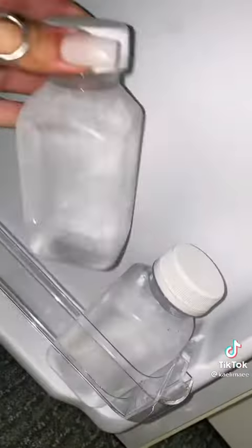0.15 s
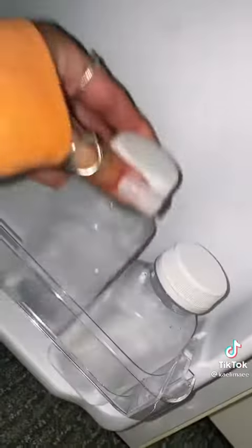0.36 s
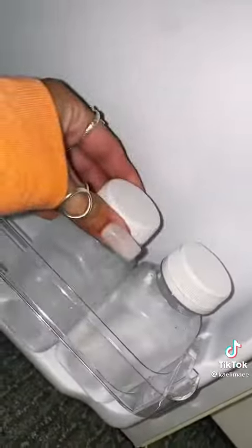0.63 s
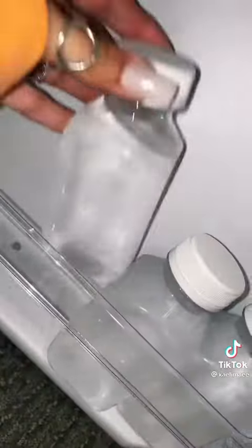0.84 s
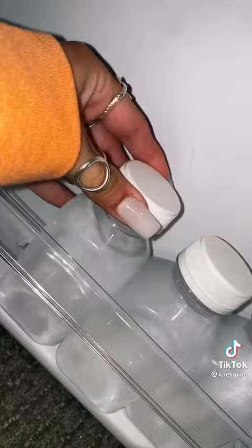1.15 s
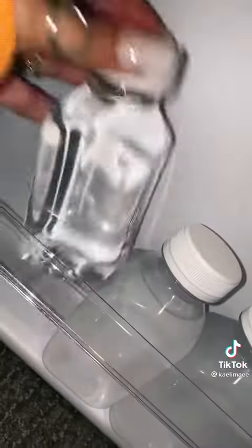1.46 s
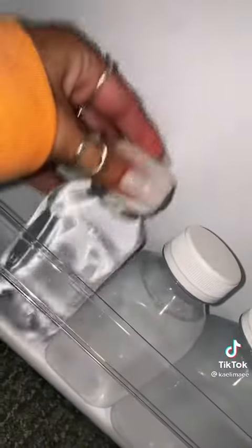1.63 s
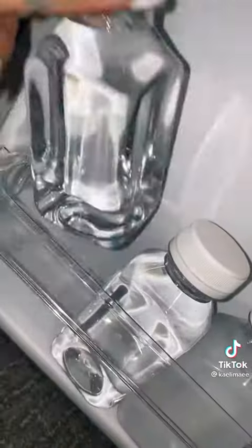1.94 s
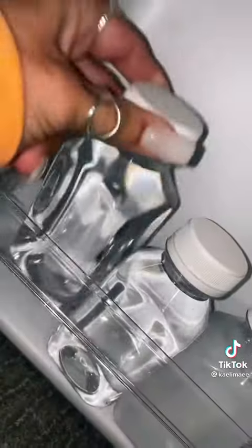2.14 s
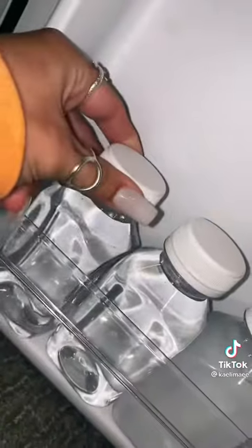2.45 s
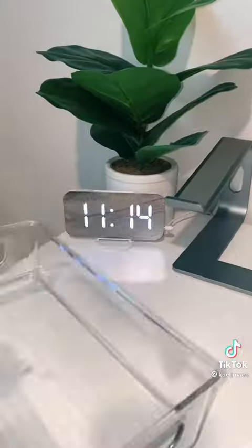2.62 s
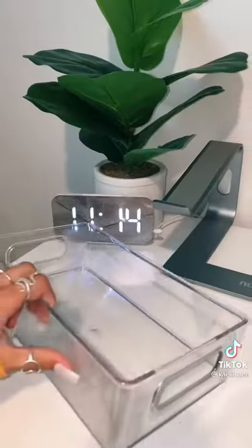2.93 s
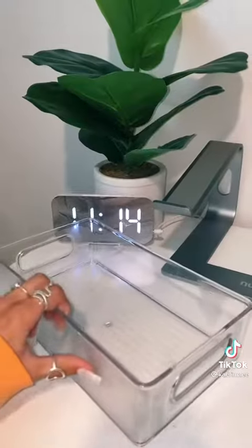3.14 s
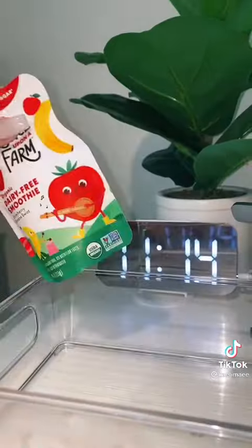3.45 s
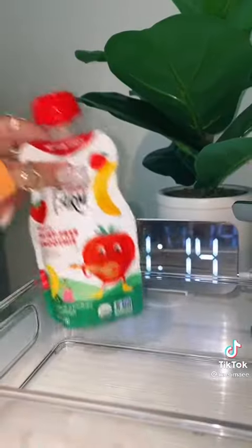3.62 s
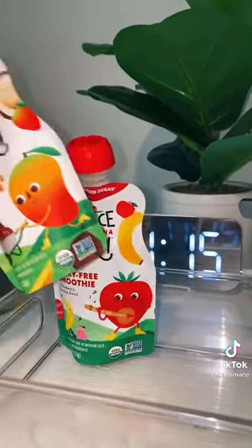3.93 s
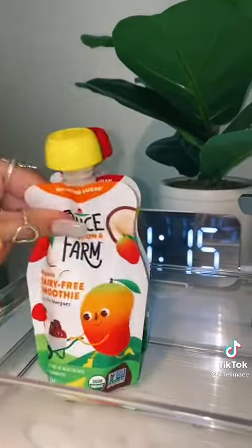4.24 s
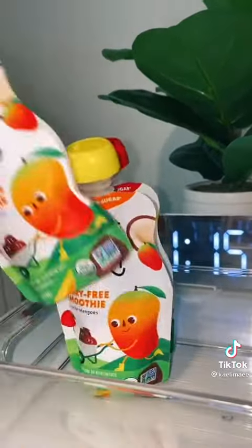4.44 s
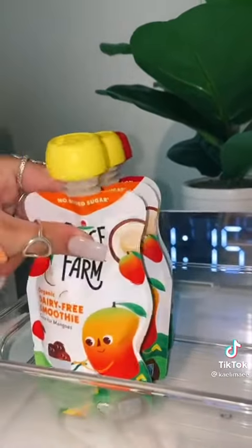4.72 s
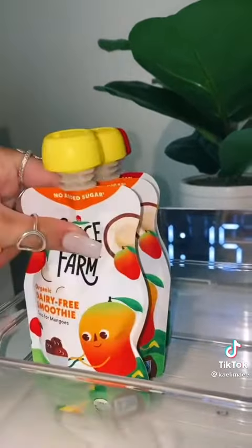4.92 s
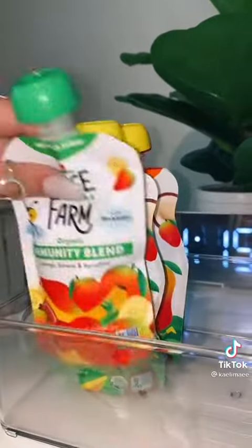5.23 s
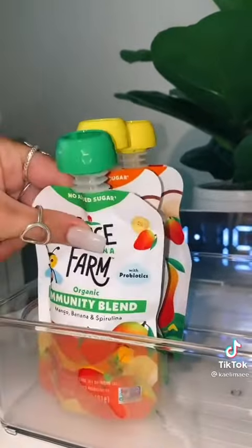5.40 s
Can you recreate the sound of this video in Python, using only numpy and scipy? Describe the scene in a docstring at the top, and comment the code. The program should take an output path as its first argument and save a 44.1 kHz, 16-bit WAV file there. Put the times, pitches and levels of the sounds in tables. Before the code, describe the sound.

Close, clipped handling sounds: squeaky bottle rubs with boomy thuds, a hard plastic clack and scrape, then light foil rustles and taps.

```python
"""On a fridge door shelf, still booming from the first bottle, full plastic bottles slide into a clear bin.
They rub, squeak and knock, and the shelf booms under each of them.
Then an empty bin is set on a desk and pushed along, juddering; soft drink pouches rustle in and land in it.
Rubbing is filtered noise with tiny slips, squeaks are rough tones, blows are bursts in ringing walls.
One microphone hears it from close by, in short stretches with dead silence between them."""
import sys
import numpy as np
from scipy import signal
from scipy.fft import rfft, irfft
from scipy.io import wavfile

SR = 44100
rng = np.random.default_rng(int(sys.argv[2]) if len(sys.argv) > 2 else 0)


def wrap_up_sound(samples):
    """Save the sound to the file named by the first command line argument, as 16-bit audio."""
    columns = np.atleast_2d(samples).T
    # keep every value between -1 and 1, then stretch to whole-number steps
    tamed = np.clip(columns, -1, 1)
    steps = np.round(tamed * 32767).astype(np.int16)
    wavfile.write(sys.argv[1], SR, steps)


N = 245637
TIME = np.arange(N) / SR
AGE = np.arange(2 ** 14) / SR  # time since a contact

# bottles touching bin and shelf: (time [s], thump level [dB], body level [dB], knock level [dB],
# click level [dB], wall ring [Hz], contact time [s])
BOTTLE_BLOWS = [(0.287, -49, -57.5, -60, -75.5, 810, 0.0038), (0.377, -66, -65, -64, -54.5, 810, 0.0082),
                (0.497, -36, -42.5, -40.5, -42, 1880, 0.0051), (0.836, -66, -52, -60, -57.5, 734, 0.011),
                (0.868, -55, -50, -58, -80, 726, 0.018), (1.057, -44, -48.5, -46.5, -60, 1400, .008),
                (1.0665, -31.5, -34.5, -35.5, -50, 1096, 0.0047),
                (1.474, -46.5, -53, -57.5, -69, 890, 0.0041), (1.565, -63.5, -55.5, -59.5, -57, 684, 0.03),
                (1.684, -30, -34.5, -32, -37, 1500, 0.0041), (2.043, -45.5, -52.5, -60, -68, 1760, 0.0071),
                (2.084, -51.5, -64, -69.5, -78, 1750, 0.0091), (2.258, -36.5, -46, -41, -42.5, 1400, 0.013),
                (2.266, -27, -41.5, -29.5, -37.5, 915, 0.01),
                (2.3035, -36.5, -46.5, -37.5, -42, 960, 0.0038)]
# pouches touching the bin and each other: same columns as the bottles
POUCH_BLOWS = [(3.562, -45.5, -53, -48.5, -58.5, 770, 0.0047), (3.621, -40.5, -44, -46, -56.5, 740, 0.0043),
               (3.7367, -47.5, -34, -33.5, -45, 794, 0.0035),
               (3.829, -61.5, -64.5, -67.5, -71, 724, 0.0034),
               (4.071, -59.5, -64, -57.5, -61, 1690, 0.0073), (4.2095, -38.5, -38, -33.5, -46, 710, 0.0043),
               (4.2385, -58, -45.5, -43.5, -75, 720, .003), (4.313, -67, -60.5, -58.5, -56, 1310, 0.0031),
               (4.553, -56, -40.5, -42.5, -52.5, 730, .0087), (4.745, -48.5, -35, -33, -44, 830, 0.0031),
               (5.114, -59, -62, -65, -54.5, 686, 0.0034), (5.135, -73, -52, -61, -73, 756, 0.017),
               (5.355, -68, -52.5, -50.5, -64, 920, 0.014), (5.4095, -41, -37, -24.5, -36.5, 1240, 0.0027)]
# modes of the desk that carries the weight: (frequency [Hz], level [dB], t60 [s])
DESK_MODES = [(128, 4, 0.09), (184, -2.5, 0.079), (250, 4, 0.08)]


def from_db(db):
    """Decibels to gain."""
    return 10 ** (np.asarray(db) / 20)


def rms_one(x):
    """Scale to unit power."""
    return x / np.sqrt(np.mean(x ** 2) + 1e-20)


def at_level(x, db):
    """Give a short sound the energy of 50 ms at this level."""
    return x * from_db(db) * np.sqrt(.05 * SR / np.sum(x ** 2))


def cut(x, hz, kind, order=4):
    """Butterworth low-, high- or band-pass."""
    return signal.sosfilt(signal.butter(order, hz, kind, fs=SR, output="sos"), x)


def colour(x, spectrum):
    """Causal (minimum-phase) filter with the given spectrum."""
    size = len(AGE)
    hz, db = np.transpose(spectrum)
    bins = np.maximum(np.arange(size // 2 + 1) * SR / size, 1)
    gain = from_db(np.interp(np.log(bins), np.log(hz), db))
    cepstrum = irfft(np.log(gain))
    # folding the cepstrum forward leaves nothing ahead of the onset
    cepstrum[1:size // 2] *= 2
    cepstrum[size // 2 + 1:] = 0
    response = irfft(np.exp(rfft(cepstrum)))[:size // 4]
    return signal.oaconvolve(x, response)[:len(x)]


def resonate(x, wall):
    """Add narrow resonances on top of a sound."""
    out = x.copy()
    for hz, width, db in wall:
        r = np.exp(-np.pi * width / SR)
        feed = np.array([1, 0, -1]) * (1 - r * r) / 2
        feedback = [1, -2 * r * np.cos(2 * np.pi * hz / SR), r * r]
        out += from_db(db) * signal.lfilter(feed, feedback, x)
    return out


def dying_noise(t60):
    """A burst of noise of unit energy that dies away."""
    burst = rng.standard_normal(len(AGE)) * from_db(-60 * AGE / t60)
    return burst / np.linalg.norm(burst)


def drift(rate):
    """Random wander of spread near 1, drawn anew this many times per second and joined by lines."""
    steps = rng.standard_normal(2000)
    return 1.2 * np.interp(TIME * rate, np.arange(len(steps)), steps)


def stroke(start, end, attack_s, release_s, sag_db=0):
    """Gain of one movement: rises 60 dB up to its start, sags until its end, then falls 60 dB per release."""
    early = np.maximum(start - TIME, 0)
    late = np.maximum(TIME - end, 0)
    progress = np.clip((TIME - start) / max(end - start, 1 / SR), 0, 1)
    level_db = -60 * (early / attack_s + late / release_s) - sag_db * progress
    return from_db(np.maximum(level_db, -200))


def swells(table, boom_db, attack_s, release_s):
    """Power of the booming that swells towards each contact and lingers after it."""
    power = 0
    for s, thump_db, *_ in table:
        # boom_db belongs to a thump of -40 dB; the boom follows a share of its strength
        level_db = boom_db + 0.19 * (thump_db + 40)
        power = power + (from_db(level_db) * stroke(s, s + 0.029, attack_s, release_s)) ** 2
    return power


def background():
    """Shelf and desk boom under the hand and around each contact, over faint room air."""
    # boom of the support, then room air: (frequency [Hz], level per Hz [dB])
    boom_colour = [(15, -43.5), (25, -10), (75, -5), (98, -2.5), (138, 6.5), (192, -7.5), (284, -12),
                   (419, -19.5), (697, -25), (900, -29.5), (1170, -52), (1980, -120)]
    air_colour = [(160, 0), (490, -22), (1000, -17.5), (2400, -25), (5000, -31), (8400, -34),
                  (10000, -43.5), (11300, -43.5), (12700, -32), (15500, -40.5)]
    hand_db, air_db = -60, -68.5  # the hand holds on steadily
    opening_db, opening_t60_s = -43.5, .17  # the shelf is still ringing from the first bottle
    power = from_db(hand_db) ** 2 + from_db(opening_db - 60 * TIME / opening_t60_s) ** 2
    power = power + swells(BOTTLE_BLOWS, boom_db=-49.5, attack_s=0.22, release_s=0.62)  # shelf
    power = power + swells(POUCH_BLOWS, boom_db=-54, attack_s=0.13, release_s=0.27)  # desk
    boom = np.sqrt(power) * rms_one(colour(rng.standard_normal(N), boom_colour))
    air = cut(colour(rng.standard_normal(N), air_colour), 220, "high", order=2)
    return boom + from_db(air_db) * rms_one(air)


def friction(spectrum, slips_per_s, slip_db, patchy_db, patches_per_s):
    """Fine hiss with tiny slips in it; its colour shifts as the contact patch moves; unit power."""
    slips = (rng.random(N) < slips_per_s / SR) * rng.standard_normal(N)
    hiss = colour(rng.standard_normal(N) + from_db(slip_db) * rms_one(slips), spectrum)
    # waves cross the thin wall by short paths; each contact point has its own, and so its own narrow peaks
    paths = [signal.oaconvolve(hiss, dying_noise(.025)[:600])[:N] for _ in range(4)]
    nearness = np.array([from_db(10 * drift(14)) for _ in paths])
    rest = hiss + np.sum(paths * nearness, axis=0) / np.linalg.norm(nearness, axis=0)
    out = 0
    # peel off one band after another and let each wander in level
    for hz in np.geomspace(500, 12000, num=9):
        band = signal.sosfiltfilt(signal.butter(3, hz, fs=SR, output="sos"), rest)
        rest = rest - band
        out = out + band * from_db(patchy_db * drift(patches_per_s))
    return rms_one(out + rest)


def lead_ins(table, lead_in_db, lead_s, attack_s, release_s):
    """Gain of a short swell of noise that rises into each knock and dies after it, in step with its level."""
    return sum(from_db(knock_db + lead_in_db) * stroke(s - lead_s, s, attack_s, release_s)
               for s, _, _, knock_db, *_ in table)


def stick_slip(hz, cycles):
    """Rough chatter around a moving pitch that loses its beat every few cycles; unit power."""
    turns = np.cumsum(hz) / SR
    grip = rng.standard_normal(20000) + 1j * rng.standard_normal(20000)
    grip = np.interp(turns / cycles, np.arange(len(grip)), grip)
    return rms_one(np.real(grip * np.exp(2j * np.pi * turns)))


def room(x, wet_db, t60, wall_hz):
    """Dull, dense reflections that follow the direct sound."""
    build_up = 1 - np.exp(-AGE / 0.0027)
    echoes = cut(dying_noise(t60) * build_up, wall_hz, "low", order=1)
    return x + from_db(wet_db) * signal.fftconvolve(x, echoes)[:len(x)]


def blows(table, spectrum, wall, support, chatter_db, ring_db, ring_q, click_top_hz, give_s, bend_s,
          wet_db, t60, wall_hz):
    """Each contact clicks, knocks in the plastic walls, flexes the whole body and sets the support thumping."""
    out = np.zeros(N + len(AGE))
    for s, thump_db, body_db, knock_db, click_db, ring_hz, contact_s in table:
        softness = contact_s / .004
        # a first touch, then micro-bounces: the longer the contact, the more they take over
        force = from_db(chatter_db) * softness * dying_noise(np.log(1000) * contact_s)
        force[0] += 1
        shell = room(resonate(colour(force, spectrum), wall), wet_db, t60, wall_hz)
        ringing = resonate(shell, [(ring_hz, ring_hz / ring_q, ring_db)])
        knock = cut(ringing, [620, 2500], "band")
        click = cut(cut(shell, 2500, "high", order=6), click_top_hz, "low", order=2)
        # slow bending waves arrive after the click
        body = np.interp(AGE - bend_s, AGE, cut(shell, [220, 620], "band"), left=0)
        # the heavy support takes up the weight slowly
        sway = sum(from_db(db - 60 * AGE / decay) * np.sin(2 * np.pi * hz * AGE)
                   for hz, db, decay in support)
        uptake = 1 - np.exp(-(AGE / (give_s * softness)) ** 2)
        thump = cut(sway * uptake, 45, "high", order=2)
        start = round(s * SR)
        low_parts = at_level(thump, thump_db) + at_level(body, body_db)
        high_parts = at_level(knock, knock_db) + at_level(click, click_db)
        out[start:start + len(AGE)] += low_parts + high_parts
    return out[:N]


def bottles():
    """Full bottles rub down the bin wall, squeak where they catch and land; a rush of noise swells into each knock."""
    # bottles sliding along the bin wall: (from [s], to [s], level at the start [dB])
    bottle_slides = [(0.379, .442, -48), (0.834, .965, -50), (1.076, 1.09, -42.5), (1.574, 1.674, -50),
                     (2.482, 2.531, -64)]
    # a bottle catching as it starts, stops or wedges into place: (time [s], level [dB], squeak [Hz])
    catches = [(.378, -43.5, 3030), (0.434, -46, 3350), (0.492, -42.5, 5620), (0.836, -44, 2933),
               (0.954, -49.5, 2740), (1.066, -28.5, 1217), (1.57, -47.5, 2955), (1.68, -29.5, 1486),
               (2.263, -31.5, 5650)]
    # colours of blows and of rubbing: (frequency [Hz], level per Hz [dB])
    bottle_colour = [(120, -40), (200, -3), (387, -12.5), (647, -16.5), (933, -9), (1140, -10),
                     (1480, -14.5), (2470, -20.5), (2700, -19), (5840, -21.5), (10300, -38), (14600, -36.5),
                     (16000, -45)]
    rub_colour = [(240, -30.5), (400, -4), (777, -0.5), (1010, -17), (1200, -4), (1380, -13.5), (1760, -11),
                  (1930, -14), (2550, -5), (3310, -9.5), (3870, -8), (8500, -18), (10500, -29.5),
                  (14800, -32), (16000, -42)]
    # resonances when struck and when rubbed: (frequency [Hz], width [Hz], level over the colour [dB])
    bottle_wall = [(302, 17, -6.5), (543, 130, -0.5), (690, 160, -2), (1440, 120, 1), (1890, 24, -3),
                   (2960, 44, -4), (4090, 130, -2), (4660, 130, -2), (5530, 300, -8), (6370, 120, -3.5)]
    rub_wall = [(710, 110, -1), (2560, 380, 2.5), (3440, 450, 4.5), (4400, 83, -4.5), (5270, 110, 3),
                (7360, 150, -0.5)]
    # modes of the hollow shelf that carries the weight: (frequency [Hz], level [dB], t60 [s])
    shelf_modes = [(68, -6, 0.13), (127, 2.5, .11), (157.5, 3.5, 0.11), (193.5, -0.5, 0.094)]

    pressure = sum(from_db(db) * stroke(start, end, attack_s=0.05, release_s=.08, sag_db=5)
                   for start, end, db in bottle_slides)
    rubbing = friction(rub_colour, slips_per_s=350, slip_db=-2.0, patchy_db=3, patches_per_s=60)
    rub = pressure * rms_one(resonate(rubbing, rub_wall))

    rush_noise = friction(bottle_colour, slips_per_s=500, slip_db=0.5, patchy_db=3.5, patches_per_s=64)
    swell = lead_ins(BOTTLE_BLOWS, lead_in_db=-10.5, lead_s=0.0082, attack_s=0.031, release_s=0.098)
    rush = swell * rms_one(cut(rush_noise, 820, "high", order=2))

    squeaks = 0
    for s, db, hz in catches:
        catch = from_db(db) * stroke(s, s + 0.0049, attack_s=.025, release_s=.08)
        squeaks = squeaks + catch * stick_slip(np.full(N, hz), cycles=3.2)

    landings = blows(BOTTLE_BLOWS, bottle_colour, bottle_wall, shelf_modes, chatter_db=4.5, ring_db=1.5,
                     ring_q=7.2, click_top_hz=11900, give_s=0.0048, bend_s=0.00044,
                     wet_db=-8.5, t60=0.11, wall_hz=5000)
    return rub + rush + squeaks + landings


def empty_bin():
    """The light bin skids down, clacks, judders over the desk and drops flat."""
    # the empty bin meeting the desk: (time [s], thump level [dB], body level [dB], knock level [dB],
    # click level [dB], wall ring [Hz], contact time [s])
    bin_blows = [(2.876, -50.5, -46.5, -40.5, -51.5, 1000, .009),
                 (2.8895, -38.5, -27, -25.5, -35.5, 1630, .0027), (2.902, -42, -34, -34, -59.5, 715, .011),
                 (3.2003, -46, -26, -23, -43, 1030, .005), (3.2075, -51.5, -33, -34.5, -51.5, 730, .0056),
                 (3.398, -58, -65.5, -70.5, -78.5, 730, .006)]
    # rate of the judder, following the speed of the push: (time [s], rate [Hz])
    judder_rate = [(2.905, 344), (2.94, 420), (3.1, 396), (3.22, 290.4)]
    # colours of blows and of dragging: (frequency [Hz], level per Hz [dB])
    bin_colour = [(88, -55.5), (150, -7.5), (341, -12.5), (545, -17.5), (998, -10), (1120, -16.5),
                  (1600, -11.5), (1940, -19), (2400, -21), (2920, -32), (4320, -33.5), (7470, -40.5),
                  (16000, -61.5)]
    drag_colour = [(100, -27), (230, -9.5), (400, -7), (620, -10), (900, -12.5), (1500, -14), (2200, -19.5),
                   (3100, -29.5), (4300, -27), (5200, -34), (8400, -34), (10300, -46), (16000, -58)]
    # resonances of the bin wall: (frequency [Hz], width [Hz], level over the colour [dB])
    bin_wall = [(354.7, 40, -7.5), (485, 40, -3.5), (662, 18, -4), (860, 72, -0.5), (975, 45, -8),
                (1270, 110, -5.5), (1480, 34, -4), (1710, 75, -5.5), (2150, 48, -7), (2344, 70, 3),
                (4330, 120, -4)]
    push_from_s, push_to_s = 2.903, 3.201  # between its two landings
    scrape_db, judder_db, bite_db = -41.5, -43, -20.5

    push = from_db(scrape_db) * stroke(push_from_s, push_to_s, attack_s=.04, release_s=0.59, sag_db=10)
    push = push + lead_ins(bin_blows, lead_in_db=-5.5, lead_s=0.0091, attack_s=0.021, release_s=0.082)
    dragging = friction(drag_colour, slips_per_s=820, slip_db=-5.5, patchy_db=2.5, patches_per_s=64)
    scrape = push * rms_one(resonate(dragging, bin_wall))

    grip = from_db(judder_db) * stroke(push_from_s, push_to_s, attack_s=.04, release_s=.3, sag_db=1.5)
    # it judders hardest as it first bites
    grip = grip + from_db(bite_db) * stroke(push_from_s, push_from_s, attack_s=0.03, release_s=0.062)
    rate_s, rate_hz = np.transpose(judder_rate)
    judder = grip * stick_slip(np.interp(TIME, rate_s, rate_hz), cycles=1.5)

    clacks = blows(bin_blows, bin_colour, bin_wall, DESK_MODES, chatter_db=-4.5, ring_db=4.5,
                   ring_q=6.0, click_top_hz=12000, give_s=0.026, bend_s=.0012,
                   wet_db=-10.0, t60=0.15, wall_hz=3000)
    return scrape + judder + clacks


def pouches():
    """Foil pouches hiss past each other, rub on the bin and tap its floor, which their soft weight damps."""
    # pouches sliding into the bin; the first has no other foil to brush: (from [s], to [s],
    # rub level [dB], foil hiss level [dB], lift of the hiss's top [dB], fading of the hiss [dB])
    pouch_slides = [(3.56, 3.723, -59.5, -84, -4, 6), (4.021, 4.18, -60.5, -55, 1.7, -1),
                    (4.528, 4.758, -59.5, -48.5, 1.5, 7), (5.117, 5.414, -59.5, -54, -2.5, 2.5),
                    (5.289, 5.293, -56, -67, -12, 3)]
    # colours of taps, of sliding and of foil hiss: (frequency [Hz], level per Hz [dB])
    pouch_colour = [(88, -61.5), (150, 11.5), (264, 7), (555, 3), (888, -3), (1080, -6.5), (1340, -1.5),
                    (1600, -4), (1940, -9.5), (2180, -14), (7920, -36), (14800, -49.5), (16000, -66)]
    slide_colour = [(100, -17), (250, 8.5), (400, 4.5), (560, -4.5), (750, 1), (1100, -3), (1700, -1),
                    (2600, -9.5), (4000, -10.5), (8000, -23), (10500, -37), (16000, -25)]
    hiss_colour = [(1000, -30.5), (2500, 3.5), (5000, -1), (7000, 2.5), (8600, 2), (10000, -6.5),
                   (12000, -4), (14000, -10), (15600, -1)]
    # resonances of the loaded bin wall: (frequency [Hz], width [Hz], level over the colour [dB])
    loaded_wall = [(246, 30, -5), (444, 180, -6), (748, 33, 0.5), (926, 64, -4), (1610, 39, -7.5),
                   (2010, 320, -11), (2610, 46, -9), (3625, 59, -16), (7700, 980, -3)]

    gain = from_db(-72) * (TIME > 3.52)  # fingers keep rubbing faintly on the pouches
    gain = gain + lead_ins(POUCH_BLOWS, lead_in_db=-7.5, lead_s=0.0086, attack_s=0.031, release_s=0.11)
    foil = friction(hiss_colour, slips_per_s=240, slip_db=-3.5, patchy_db=2.5, patches_per_s=45)
    low = cut(foil, 7000, "low", order=3)
    top = cut(foil, 7000, "high", order=3)
    hiss = 0
    for start, end, rub_db, hiss_db, top_db, fade_db in pouch_slides:
        gain = gain + from_db(rub_db) * stroke(start, end, attack_s=0.08, release_s=0.19)
        brush = from_db(hiss_db) * stroke(start, end, attack_s=.035, release_s=0.14, sag_db=fade_db)
        hiss = hiss + brush * (low + from_db(top_db) * top)
    sliding = friction(slide_colour, slips_per_s=300, slip_db=-2.5, patchy_db=2.0, patches_per_s=28)
    slide = gain * rms_one(resonate(sliding, loaded_wall))

    taps = blows(POUCH_BLOWS, pouch_colour, loaded_wall, DESK_MODES, chatter_db=6.5, ring_db=6,
                 ring_q=2.4, click_top_hz=12000, give_s=0.0022, bend_s=0.00093,
                 wet_db=-10.5, t60=0.13, wall_hz=3020)
    return slide + hiss + taps


def scene():
    """All the handling, close to one microphone."""
    return (background() + bottles() + empty_bin() + pouches())[None]


def record(dry):
    """Each stretch fades in and stops dead; the top is cut above 15.6 kHz."""
    # stretches that are heard: (from [s], to [s])
    stretches = [(-.1, .138), (.235, .691), (.77, 1.282), (1.383, 1.889), (1.978, 2.59), (2.667, 3.414),
                 (3.493, 3.89), (3.972, 4.385), (4.495, 4.955), (5.046, 5.7)]
    heard = 0
    for start, end in stretches:
        fade_in = np.clip((TIME - start) / .02, 0, 1)
        stop = np.clip((end - TIME) / .002, 0, 1)
        heard = heard + fade_in * stop
    top_cut = signal.ellip(10, .1, 80, 15600, fs=SR, output="sos")
    return signal.sosfilt(top_cut, dry * heard)


dry = scene()
out = record(dry)
wrap_up_sound(out)
```